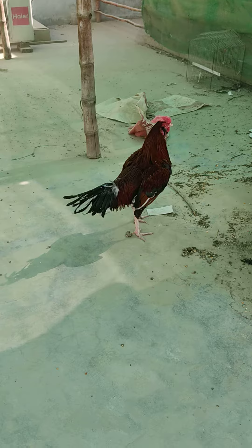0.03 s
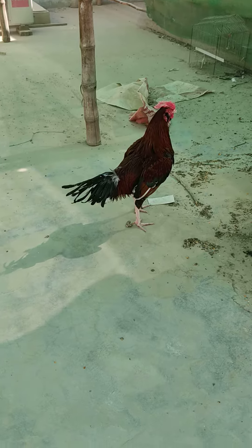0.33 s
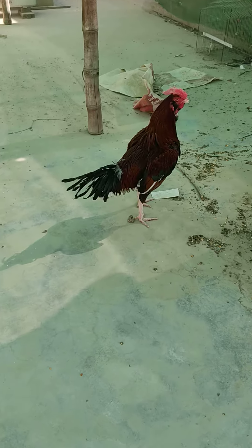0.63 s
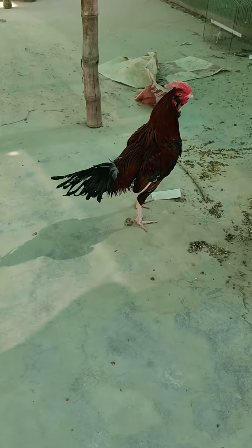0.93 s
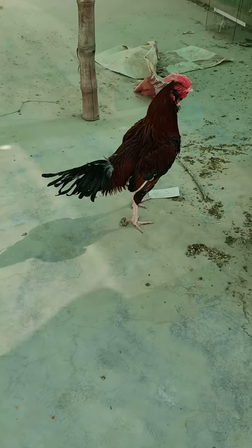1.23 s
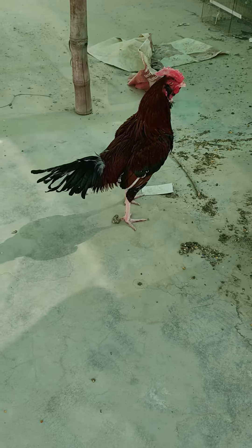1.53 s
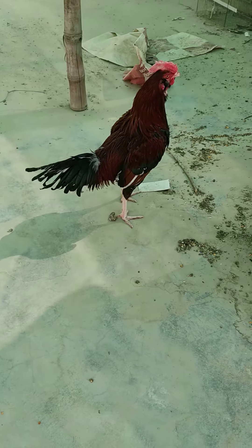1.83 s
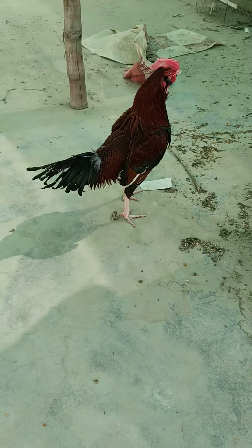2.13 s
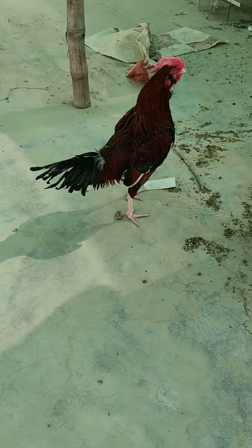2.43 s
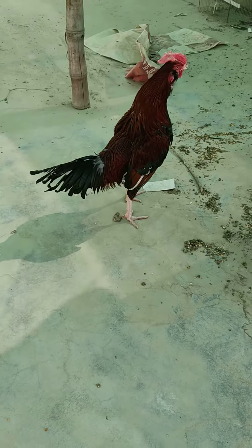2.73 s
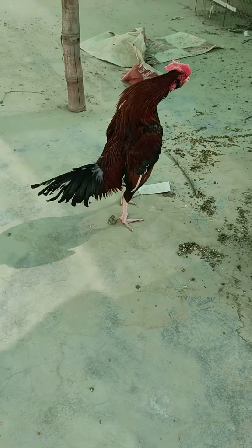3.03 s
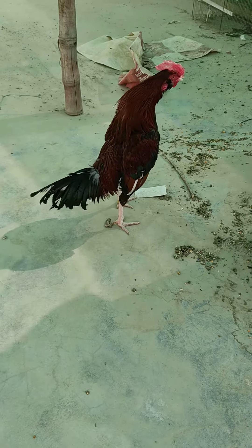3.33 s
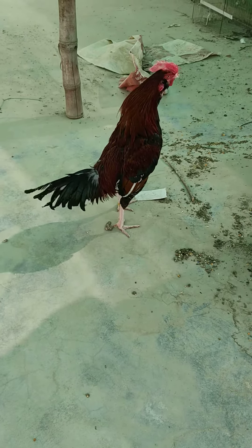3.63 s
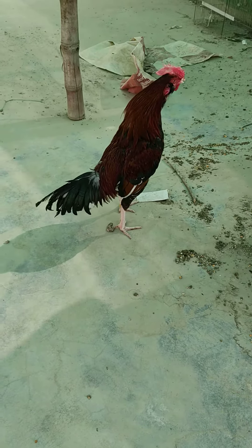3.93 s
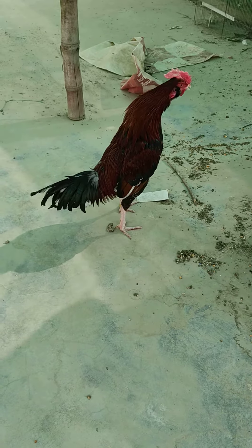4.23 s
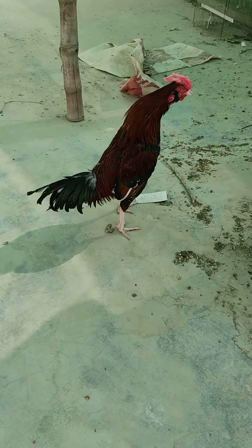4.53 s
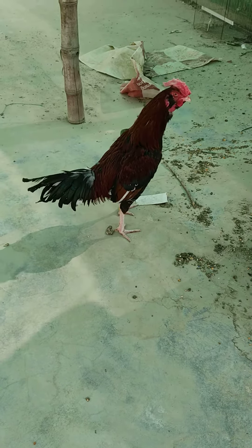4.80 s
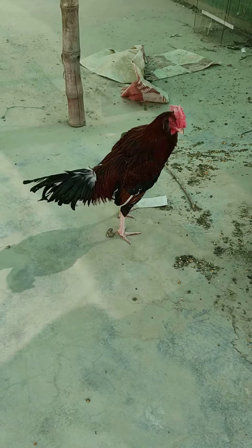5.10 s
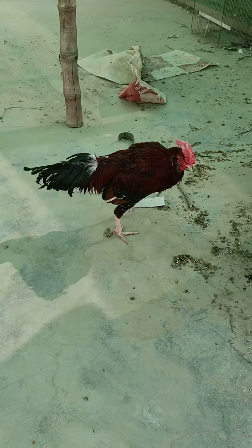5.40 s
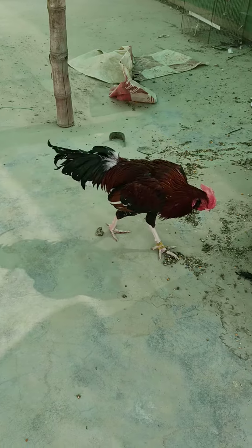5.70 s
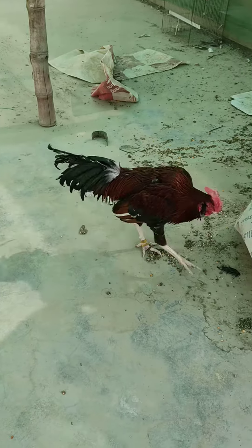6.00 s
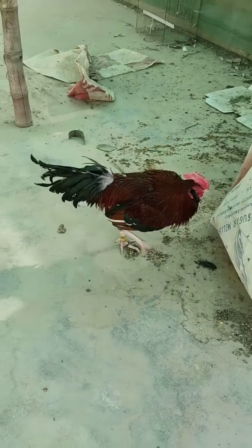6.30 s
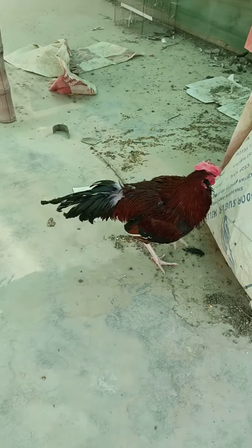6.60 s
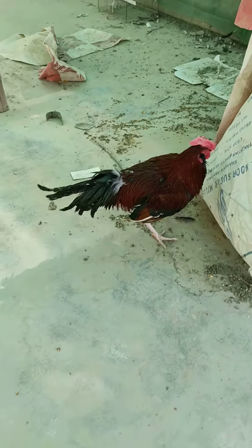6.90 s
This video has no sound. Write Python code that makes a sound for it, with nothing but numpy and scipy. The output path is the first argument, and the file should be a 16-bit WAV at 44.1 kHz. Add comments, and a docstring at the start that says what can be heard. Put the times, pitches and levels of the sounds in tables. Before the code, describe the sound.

Light rustling and a scuff over quiet outdoor air, then one close, hoarse rooster crow, followed by crackly steps and faint clucking.

```python
"""A quiet outdoor rumble with thin, far-off calls; nearby a woven sack rubs and crackles, and
something scuffs the concrete yard. Then a rooster crows once, close by: four syllables, clean, then
hoarse, then a long falling note that ends in a rasp. The two sides of his syrinx pulse at different
pitches through windpipe and beak, and the walls echo. Afterwards he steps over grit and clucks softly.
A phone with two ports picks it all up."""
import sys
import numpy as np
from scipy import signal
from scipy.fft import rfft, irfft, next_fast_len
from scipy.io import wavfile
from scipy.ndimage import uniform_filter1d, minimum_filter1d

SR = 44100
rng = np.random.default_rng(int(sys.argv[2]) if len(sys.argv) > 2 else 0)


def unload_audio(sound):
    """Save the sound as a 16-bit wav file, at the path given as the first command line argument."""
    columns = np.transpose(np.atleast_2d(sound))
    # keep every value between -1 and 1, then stretch to whole-number steps
    steps = np.round(np.clip(columns, -1, 1) * 32767)
    wavfile.write(sys.argv[1], SR, steps.astype(np.int16))


N = 306495
TIME = np.arange(N) / SR
TOP_HZ = 15900


def undb(db):
    """Decibels to gain."""
    return 10 ** (np.asarray(db) / 20)


def unit(x):
    """Scale to rms 1."""
    return x / np.sqrt(np.mean(x ** 2) + 1e-20)


def steady(x, window_s=0.037):
    """Hold the short-term rms at 1."""
    return x / np.sqrt(np.abs(uniform_filter1d(x ** 2, int(window_s * SR))) + 1e-14)


def wander(rate_hz):
    """Smooth random modulation of rms 1, as fast as rate_hz."""
    return unit(signal.sosfilt(signal.butter(2, rate_hz, fs=SR, output="sos"), rng.standard_normal(N)))


def curves(table):
    """The columns of a table, joined by straight lines in time."""
    times, *columns = np.transpose(table)
    return [np.interp(TIME, times, column) for column in columns]


def envelope(start, end, attack_s, release_s):
    """Level in dB, held at 0 from start to end; attack and release are in seconds per 20 dB."""
    before, after = np.maximum(start - TIME, 0), np.maximum(TIME - end, 0)
    return np.maximum(-20 * (before / attack_s + after / release_s), -200)


def band(x, lo_hz, hi_hz, order=4):
    """Band-pass."""
    sos = signal.butter(order, [lo_hz, min(hi_hz, .48 * SR)], "band", fs=SR, output="sos")
    return signal.sosfilt(sos, x)


def colour(x, points, size=4096):
    """Minimum-phase EQ through points of f/Hz, level/dB."""
    hz, db = np.transpose(points)
    log_hz = np.log(np.fft.rfftfreq(size, 1 / SR) + 1)
    log_gain = np.log(undb(np.interp(log_hz, np.log(hz), db)))
    cepstrum = irfft(log_gain)[:size // 2]
    cepstrum[0] /= 2
    response = irfft(np.exp(rfft(2 * cepstrum, size)))
    return signal.fftconvolve(x, response.reshape((1,) * (x.ndim - 1) + (-1,)))[..., :N]


def delay(x, ms):
    """Delay by any fraction of a sample."""
    size = next_fast_len(N + SR // 4)
    shift = np.exp(-2j * np.pi * np.fft.rfftfreq(size, 1 / SR) * ms / 1000)
    return irfft(rfft(x, size) * shift, size)[:N]


def spread(pair, likeness):
    """Two unrelated signals as left and right with a given correlation."""
    mid = np.sqrt(1 + likeness) * pair[0]
    side = np.sqrt(1 - likeness) * pair[1]
    return np.array([mid + side, mid - side]) / np.sqrt(2)


# EQ of the open-air bed: f/Hz, level/dB
AIR_EQ = [(13, -57), (22, -2), (121, -6), (196, -2), (478, -14), (778, -15.5), (940, -19), (1570, -23.5),
          (2290, -27.5), (2770, -23.5), (3080, -34), (8160, -39.5), (8850, -39), (14000, -84.5)]
def outdoors(level_db=-49.5, lean_left_db=2.5):
    """Distant rumble, alike at both ports, under a faint, wide hiss."""
    air = colour(rng.standard_normal((2, N)), AIR_EQ)
    rumble = signal.sosfiltfilt(signal.butter(2, 600, fs=SR, output="sos"), air)
    hiss = spread(air - rumble, likeness=0.1)
    bed = spread(rumble, likeness=0.78) * undb([[lean_left_db], [-lean_left_db]]) + hiss
    swell_db = .6 * wander(3)
    return unit(bed) * undb(level_db + swell_db)


# far whistles: t/s, length/s, start f/Hz, end f/Hz, level/dB, relative overtone/dB, quiver/share of pitch
WHISTLES = [(0.017, 0.062, 4364, 4160, -53, -1.5, 0.028), (0.025, 0.054, 4970, 4750, -57, -32, 0.02),
            (0.06, 0.073, 4370, 4580, -57.5, -25, 0.0073), (-.1, 0.31, 664.5, 643, -59, -13.5, .006),
            (1.75, 0.045, 2930, 2930, -69, -23, .05), (1.823, 0.098, 2980, 3940, -65.5, -10, 0.093),
            (1.907, .13, 2616, 3100, -65, -10.5, 0.093), (2.069, 0.073, 3880, 2780, -63.5, -20, 0.12),
            (2.15, 0.11, 3090, 2840, -62.5, -19, 0.045), (2.302, 0.51, 2960, 2760, -77.5, -25, 0.019)]
def far_calls():
    """Faint gliding, quivering whistles, blurred by distance."""
    out, tremble = np.zeros(N), wander(365)
    for start, length, start_hz, end_hz, db, overtone_db, quiver in WHISTLES:
        progress = (TIME - start) / length
        live = (progress > 0) & (progress < 1)
        hz = (start_hz + (end_hz - start_hz) * progress[live]) * (1 + quiver * tremble[live])
        phase = 2 * np.pi * np.cumsum(hz) / SR
        note = np.sin(phase) + undb(overtone_db) * np.sin(2 * phase)
        out[live] += undb(db) * np.sqrt(2 * np.sin(np.pi * progress[live])) * note
    return out + yard_echo(out, early_db=5.5, late_db=-6, t60=1.0)


def yard_echo(x, early_db, late_db, t60, early_t60=0.23, damp_hz=3500):
    """Sparse reflections from ground and walls, then a dull tail; different at each port."""
    t = TIME[:SR]
    noise = rng.standard_normal((4, SR))
    early = noise[:2] ** 5 * (t > .003) * undb(-60 * t / early_t60)  # the power leaves sparse spikes
    late = noise[2:] * np.minimum(t / 0.1, 1) * undb(-60 * t / t60)
    late = signal.sosfilt(signal.butter(1, damp_hz, fs=SR, output="sos"), unit(late))
    response = (undb(early_db) * unit(early) + undb(late_db) * late) / np.sqrt(SR)
    return signal.fftconvolve(x[None], response)[:, :N]


def grit(grain_db, grain_hz):
    """Dense tiny slips of uneven size, heard differently at each port."""
    return unit(rng.standard_normal((2, N)) * undb(grain_db * wander(grain_hz)))


def loose_grains(rate_hz=160, size_db=4):
    """Lone ticks of sand and stiff fibres, mostly small."""
    chance = rng.random((2, N))
    sizes = undb(size_db * np.minimum(-np.log(chance[1] + 1e-9), 3))
    return unit((chance[0] < rate_hz / SR) * sizes * rng.standard_normal((2, N)))


# EQ of the friction: f/Hz, level/dB
RUB_EQ = [(290, -32.5), (500, 3), (586, -21.5), (988, -5.5), (1260, -12), (1690, -12), (2230, -9.5),
          (2460, -5), (4090, -12.5), (7420, -5), (8580, -11.5), (9920, -31), (16000, -29)]
# sack strokes and scrapes over grit: t/s, length/s, hiss level/dB, body level/dB (both before trim)
STROKES = [(0.17, 0.033, -42, -61), (0.234, 0.017, -39.5, -48), (0.291, 0.01, -38.5, -46.5),
           (0.371, 0.076, -44.5, -48.5), (0.585, 0.045, -52, -60.5), (0.872, 0.3, -61, -77),
           (1.094, 0.058, -50, -59), (1.236, 0.069, -47.5, -61), (1.46, 0.026, -55.5, -72),
           (1.884, 0.061, -60.5, -66), (2.046, 0.15, -58.5, -65), (2.37, 0.23, -68.5, -61.5),
           (2.738, 0.0067, -39.5, -57), (2.834, 0.027, -44, -54.5), (3.001, 0.047, -43, -65),
           (3.138, 0.035, -37, -72), (4.904, .05, -42, -42.5), (5.058, .025, -39.5, -39),
           (5.112, 0.064, -46, -55), (5.255, 0.13, -44, -49.5), (5.364, 0.011, -37.5, -36),
           (5.405, 0.08, -39, -48), (5.682, 0.07, -45.5, -59), (5.889, 0.0054, -39, -44.5),
           (5.976, 0.042, -45.5, -46.5), (6.065, 0.079, -47, -57.5), (6.144, 0.037, -41.5, -72),
           (6.18, 0.0052, -32, -56), (6.28, 0.025, -49, -51.5), (6.52, 0.018, -47.5, -53),
           (6.69, 0.038, -34.5, -51.5), (6.834, 0.016, -42, -66), (6.945, .01, -38.5, -58)]
def rubs(hiss_trim_db=-3.5, body_trim_db=0.5, grains_db=-5, attack_s=0.023, release_s=0.09):
    """Woven plastic and grit rub with a hiss and a lower rustle, which goes on faintly as he walks."""
    friction = colour(grit(grain_db=1.0, grain_hz=194) + undb(grains_db) * loose_grains(), RUB_EQ)
    hiss = unit(band(friction, 3680, TOP_HZ, order=3)) * undb(hiss_trim_db)
    body = unit(band(friction, 700, 2100, order=2)) * undb(body_trim_db)
    walk_db = envelope(3.2, 6.95, attack_s, release_s)
    hiss_db, body_db = walk_db - 53.5, walk_db - 59.5
    for start, length, high_db, low_db in STROKES:
        stroke_db = envelope(start, start + length, attack_s, release_s)
        hiss_db = np.maximum(hiss_db, high_db + stroke_db)
        body_db = np.maximum(body_db, low_db + stroke_db)
    return hiss * undb(hiss_db) + body * undb(body_db)


# EQ of the ticks: f/Hz, level/dB
CRACKLE_EQ = [(180, -70.5), (300, 13), (946, 18), (1230, 3), (1930, 0.5), (2250, -11), (2520, -0.5),
              (4990, -8.5), (7320, 0.5), (9880, -16), (16000, -47)]
# sack crackles and steps on grit: t/s, spray level/dB (before trim), relative low band/dB, t60/s
SNAPS = [(0.2346, -48, 0, 0.1), (0.2914, -36, -9, 0.078), (0.3102, -38, -17, 0.053),
         (0.4011, -33, -3.5, 0.1), (0.6222, -46.5, -9, 0.096), (0.86, -56.5, -6, 0.08),
         (2.786, -46.5, -25, 0.14), (2.8428, -41, -1, 0.099), (4.6764, -39, 17.5, 0.065),
         (4.705, -27, 5, 0.06), (4.8951, -34.5, 5.5, 0.055), (4.9504, -28.5, -10, 0.081),
         (5.083, -38, 3.5, 0.076), (5.267, -50, 2, 0.089), (5.328, -39, -18, 0.15),
         (5.3683, -35.5, 3.5, 0.09), (5.8194, -38.5, -6, 0.1), (5.885, -36, 0, 0.1),
         (6.1982, -39.5, -14, 0.087), (6.4195, -38.5, -2, 0.11), (6.6698, -43, -7, 0.04),
         (6.734, -40, -3.5, 0.073), (6.9246, -43.5, -5, 0.024)]
def crackles(trim_db=-3, snap_db=5, snap_s=0.0041):
    """Sack or grit snaps and sheds a short spray of smaller ticks."""
    high, low = np.zeros((2, N))
    for start_s, db, low_db, t60 in SNAPS:
        start = int(start_s * SR)
        t = TIME[:min(N - start, SR // 2)]
        decay = undb(db) * (undb(-60 * t / t60) + undb(snap_db) * np.exp(-t / snap_s))
        high[start:start + len(t)] += decay
        low[start:start + len(t)] += decay * undb(low_db)
    ticks, out = grit(grain_db=0.5, grain_hz=610), 0
    for force, lo_hz, hi_hz in ((high, 1500, TOP_HZ), (low, 400, 1500)):
        rms = np.std(band(colour(ticks[0], CRACKLE_EQ), lo_hz, hi_hz, order=2))
        out += band(colour(ticks * force, CRACKLE_EQ), lo_hz, hi_hz, order=2) / rms
    return undb(trim_db) * out


# EQ of scraped concrete: f/Hz, level/dB
SCUFF_EQ = [(240, -47), (400, -24), (439, -12), (626, -20), (708, -12), (742, -9.5), (1200, -3.5),
            (1380, -2.5), (2250, 1.5), (3370, -8.5), (7630, -1.5), (10400, -21.5), (16000, -46)]
def scuff(start_s=1.507, hold_s=0.07, level_db=-34.5):
    """Something scuffs the concrete once: a brisk burst of coarse friction."""
    scrape = unit(colour(grit(grain_db=3.5, grain_hz=500), SCUFF_EQ))
    return scrape * undb(level_db + envelope(start_s, start_s + hold_s, attack_s=0.005, release_s=0.093))


# four syllables (the last split into hoarse entry and clean hold) and a dry closing rasp:
# start t/s, end t/s, attack and release/(s per 20 dB), base level/dB of fundamental, throat band, treble
CROW_ENVELOPES = [(3.172, 3.303, 0.0016, 0.09, -11.5, -28, -28.5),
                  (3.459, 3.538, 0.014, 0.06, -6, -23, -25.5),
                  (3.622, 3.932, 0.0128, 0.0874, -9.5, -25.5, -27),
                  (4.161, 4.295, 0.06, 0.0325, -9.5, -22.5, -28.5),
                  (4.304, 4.604, 0.1257, 0.06, -10, -24, -29), (4.654, 4.714, 0.2, 0.06, -29, -26.5, -31)]
def syllable_gains(hz, rough, easy_hz=609, strained_hz=771.6, treble_lead_s=0.015, rough_fill=0.64):
    """Three band gains: syllables rise, hold and die; strain moves weight up into the throat band."""
    low, mid, top = np.full((3, N), -np.inf)
    for start, end, attack_s, release_s, low_db, mid_db, top_db in CROW_ENVELOPES:
        pressure_db = envelope(start, end, attack_s, release_s)
        low = np.maximum(low, low_db + pressure_db)
        mid = np.maximum(mid, mid_db + pressure_db)
        top = np.maximum(top, top_db + envelope(start - treble_lead_s, end, attack_s, release_s))
    strain = (hz - easy_hz) / (strained_hz - easy_hz)
    push_db = 4.5 * np.exp(-((TIME - 4.565) / .04) ** 2)  # the long note swells just before it breaks
    # hoarseness gives back part of the weakened fundamental
    low += -17 * np.maximum(strain, 0) ** 2 * (1 - rough_fill * rough) + push_db
    mid += 14 * strain - push_db
    top += 3.5 * strain + push_db / 2
    return undb(low), undb(mid), undb(top)


def membrane(hz):
    """The sharp pulses of a syrinx membrane, equal in all harmonics, and their phase."""
    phase = 2 * np.pi * np.cumsum(hz) / SR
    live = (TIME > CROW_ENVELOPES[0][0] - .1) & (TIME < CROW_ENVELOPES[-1][1] + .3)
    pulses = np.zeros(N)
    pulses[live] = sum(np.cos(k * phase[live]) * (k * hz[live] < TOP_HZ) for k in range(1, 28))
    return pulses, phase


# pitch gestures of the main side, one list per phrase: t/s, f/Hz, roughness (capped at 1)
CROW_GESTURES = [
    [(3.162, 600.6, .05), (3.176, 654.4, 0.28), (3.21, 635, 0.19), (3.24, 630.3, 0.07),
     (3.258, 715.2, 0.94), (3.325, 725.8, 1.15), (3.385, 659.5, 0.54)],
    [(3.44, 673.8, 0.65), (3.458, 718, 0.62), (3.485, 764.8, 0.03), (3.508, 750.6, 0), (3.527, 738.7, 0.6),
     (3.545, 586, .3)],
    [(3.618, 599.8, 0.22), (3.636, 749.4, 0.96), (3.73, 765, .85), (3.83, 763.6, 1), (3.925, 735, 0.9),
     (4.01, 619.5, 0.55)],
    [(4.1, 586.3, 0.48), (4.175, 574, 0.45), (4.225, 624.6, .76), (4.268, 655, 1.08), (4.295, 624.7, 0.42),
     (4.35, 619.4, .05), (4.41, 616.8, .01), (4.5, 603.5, 0.01), (4.565, 590, 0), (4.59, 579.5, .15),
     (4.618, 521.4, 0.48)],
    [(4.635, 529.6, 1.21), (4.72, 573, 0.9)],
]
# resonances of windpipe and open beak: f/Hz, level/dB
THROAT_EQ = [(300, -39), (450, -18), (620, -3), (900, -23.5), (1150, -24), (1530, -10.5), (1850, -20.5),
             (2250, -26), (2650, -25), (3000, -27.5), (3380, -45.5), (3700, -60), (4300, -53.5),
             (4800, -39.5), (5150, -40.5), (6150, -38.5), (7600, -43.5), (8350, -52.5), (8900, -54),
             (12000, -66), (15500, -79)]
def main_side(slip=.08, jitter=.016, shimmer=.45, air_db=-35, rasp_db=-10):
    """Pushed hard, the main membrane slips out of its cycle, dips in pitch and sputters."""
    hz, rough = curves(np.vstack(CROW_GESTURES))
    rough = np.clip(rough, 0, 1)
    slips = np.clip(wander(115), 0, 2) ** 2
    pulses, phase = membrane(hz * (1 + rough * (jitter * wander(250) - slip * slips)))
    pulses *= 1 + shimmer * rough * wander(110)
    puffs = 2 * rng.standard_normal(N) * (1 + np.cos(phase))
    source = pulses + puffs * (undb(air_db) + rough * undb(rasp_db))
    voice = colour(source, THROAT_EQ)
    low = steady(band(voice, 290, 1290))
    mid = steady(steady(band(voice, 1276, 2350)) + rough * windpipe_tone(hz))
    # the treble sits back to leave room for the narrow rings of the beak
    top = undb(-3) * steady(band(voice, 3210, TOP_HZ)) + beak_rings(source)
    low_gain, mid_gain, top_gain = syllable_gains(hz, rough)
    return low * low_gain + mid * mid_gain + top * top_gain


# the second side joins at syllable edges and in hoarse stretches:
# start t/s, end t/s, f/Hz, level/dB (before trim)
SECOND_VOICE = [(3.162, 3.173, 525, -15.5), (3.251, 3.347, 573.7, -16), (3.447, 3.457, 507.2, -13.5),
                (3.532, 3.558, 526.8, -19), (3.603, 3.642, 547.6, -15.5), (3.653, 3.925, 539, -24),
                (3.955, 3.985, 560, -17), (4.104, 4.158, 554, -16.5), (4.188, 4.272, 554, -17.5)]
def second_side(odd_db=-17, treble_db=-3, trim_db=-2):
    """The other membrane is lower, sounds mostly even harmonics and turns hoarse with the main one."""
    hz, = curves([(t, pitch) for start, end, pitch, _ in SECOND_VOICE for t in (start, end)])
    bursts_db = [db + envelope(start, end, attack_s=0.0086, release_s=.014)
                 for start, end, _, db in SECOND_VOICE]
    rough = np.clip(curves(np.vstack(CROW_GESTURES))[1], 0, 1)
    hz *= 1 + (.004 + .04 * rough ** 2) * wander(140)
    sputter = 1 + .35 * rough * wander(60)
    voice = colour(undb(odd_db) * membrane(hz)[0] + membrane(2 * hz)[0], THROAT_EQ)
    voice = band(voice, 540, 1910, order=3) + undb(treble_db) * band(voice, 4100, 11000)
    return steady(voice) * sputter * undb(np.max(bursts_db, axis=0) + trim_db)


# narrow resonances, one list per held beak shape: f/Hz, width/Hz, level/dB against the treble
BEAK_MODES = [
    [(4087, 110, -2), (4910, 580, 0.5), (6640, 140, -3)],
    [(5996, 220, -7.5), (7670, 65, -5.5), (8397, 400, -14)],
    [(3014, 390, -6.5), (7200, 210, -21.5), (7080, 160, -15), (8265, 110, -10.5)],
    [(6140, 230, -5), (7330, 120, -10)],
    [(4217, 180, 0), (5930, 240, -5.5), (7670, 110, -10), (15100, 700, -24.5)],
]
def beak_rings(source):
    """Each shape of the beak picks a few high harmonics out of the voice."""
    out = np.zeros(N)
    for (start, end, attack_s, release_s, *_), modes in zip(CROW_ENVELOPES, BEAK_MODES):
        held = undb(envelope(start - attack_s / 2, end, attack_s, release_s))
        live = held > .01
        for hz, width_hz, db in modes:
            ring = band(source[live], hz - width_hz / 2, hz + width_hz / 2, order=2)
            out[live] += steady(ring, window_s=0.3) * undb(db) * held[live]
    return out


def windpipe_tone(hz, resonance_hz=1530, width_hz=60, jitter=0.0129):
    """Where the second harmonic meets the windpipe resonance, a firm tone holds through the rasp."""
    phase = 2 * np.pi * np.cumsum(2 * hz * (1.005 + jitter * wander(85))) / SR
    nearness = np.exp(-((2 * hz - resonance_hz) / width_hz) ** 2)
    return np.sqrt(2) * nearness * np.sin(phase)


def rooster(port_lag_ms=0.13, left_db=-1.25, right_db=-2.05):
    """Both sides of the syrinx ring out into the yard; the crow reaches the right port first."""
    voice = main_side() + second_side()
    direct = np.array([undb(left_db) * delay(voice, port_lag_ms), undb(right_db) * voice])
    overtones = band(voice, 1300, 16000, order=2)  # short waves bounce about more than the fundamental
    scatter = yard_echo(overtones, early_db=-7, late_db=-20, t60=.5, early_t60=.07)
    walls = yard_echo(voice, early_db=-20, late_db=-17.5, t60=.56, early_t60=.12)
    return direct + scatter + walls


# soft clucks: t/s, level/dB (before trim), f/Hz
CLUCK_NOTES = [(5.374, -48, 484), (5.499, -41.5, 413), (5.651, -41, 436), (5.795, -47, 435),
               (5.929, -44.5, 452), (6.059, -40, 444), (6.208, -39, 437), (6.369, -45, 445)]
def clucks(length_s=0.0705, rise=0.2, trim_db=-7, overtone_db=-2, husk_db=-4):
    """Short, low, slightly rising notes, husky, with the beak nearly shut."""
    out, waver = np.zeros(N), 1 + 0.02 * wander(120)
    husk = undb(husk_db) * unit(band(rng.standard_normal(N), 470, 1250, order=2))
    for start, db, hz in CLUCK_NOTES:
        progress = (TIME - start) / length_s
        live = (progress > 0) & (progress < 1)
        glide = 1 + rise * (progress[live] - .5)
        phase = 2 * np.pi * np.cumsum(hz * waver[live] * glide) / SR
        note = np.sin(phase) + undb(overtone_db) * np.sin(2 * phase) + husk[live]
        out[live] += undb(db + trim_db) * np.sin(np.pi * progress[live]) * note
    return out


def scene():
    """The rooster up front, the small close sounds around him and the open air behind."""
    foley = rubs() + scuff() + crackles()
    bird = rooster() + clucks()
    foley_echo = yard_echo(foley[0], early_db=-5.5, late_db=-12.0, t60=0.36)
    return bird + foley + foley_echo + far_calls() + outdoors()


def record(dry, ceiling=0.71, hold_s=0.0036):
    """The phone turns both channels down smoothly around the loudest peaks and cuts the top."""
    hold = int(hold_s * SR)
    gain = np.minimum(1, ceiling / (np.abs(dry).max(axis=0) + 1e-9))
    gain = uniform_filter1d(minimum_filter1d(gain, 2 * hold + 1), hold)
    return signal.sosfilt(signal.ellip(8, .2, 70, TOP_HZ, fs=SR, output="sos"), dry * gain)


dry = scene()
out = record(dry)
unload_audio(out)
```